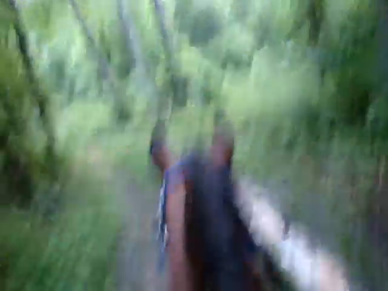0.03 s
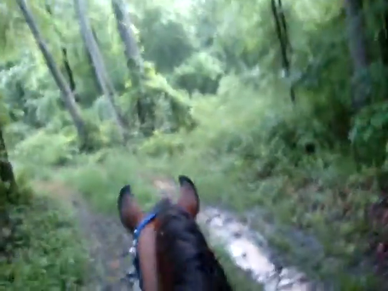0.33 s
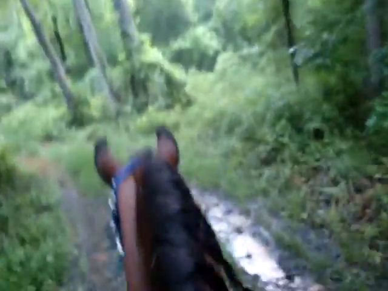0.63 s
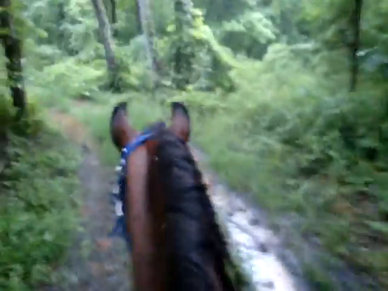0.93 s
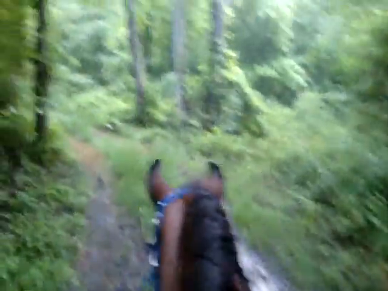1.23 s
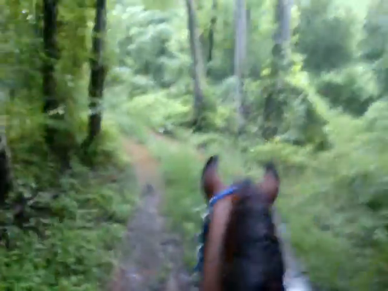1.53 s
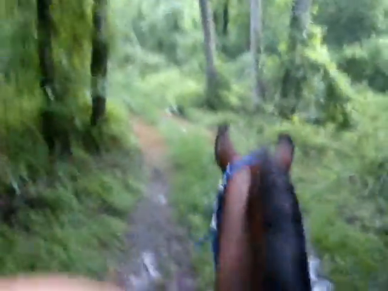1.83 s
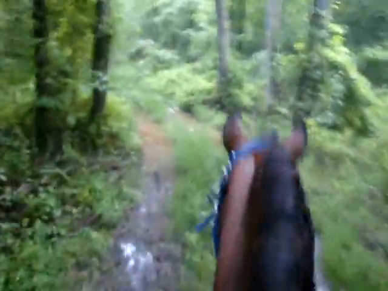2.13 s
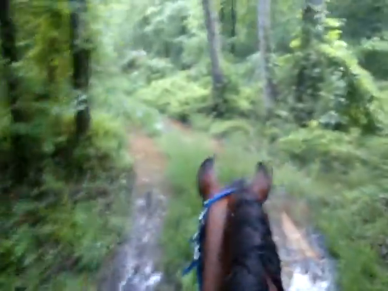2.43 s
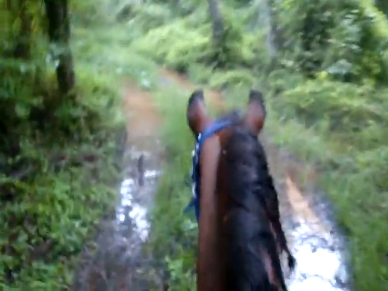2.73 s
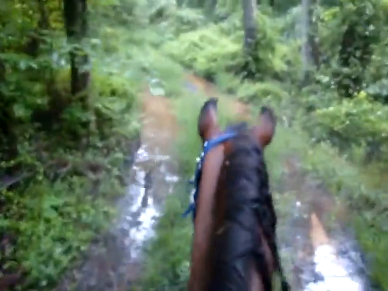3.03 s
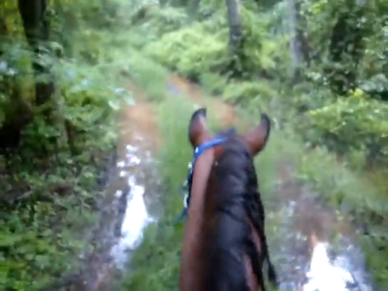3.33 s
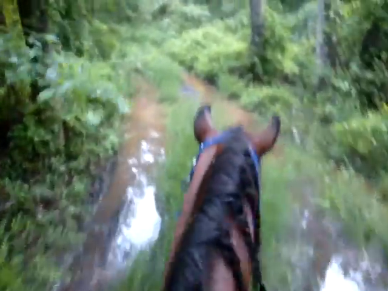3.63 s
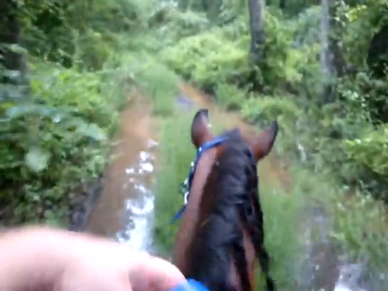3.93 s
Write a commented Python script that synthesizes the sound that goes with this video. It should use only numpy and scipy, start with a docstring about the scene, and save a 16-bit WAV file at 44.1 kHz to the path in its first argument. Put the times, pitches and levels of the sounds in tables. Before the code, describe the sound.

A horse's hooves slap and splash through mud and puddles over a steady wet woodland hiss.

```python
"""A horse walks a wet, muddy woodland track, heard from the saddle on a hand-held mono camera.
Below the microphone, hooves slap into mud, pop pockets of air and throw up water that falls back
as drops; the tack clicks now and then. Right at the microphone, the hand rubs and knocks on the
camera, mostly at first, and air buffets it softly. All around, the wet wood hisses and drips."""
import sys
import numpy as np
from scipy import signal
from scipy.fft import rfft, irfft
from scipy.io import wavfile
from scipy.ndimage import uniform_filter1d

SR = 44100
rng = np.random.default_rng(int(sys.argv[2]) if len(sys.argv) > 2 else 0)


def materialize(psi):
    """Save the field psi as 16-bit PCM at rate SR to the path in sys.argv[1].

    A 1-D psi becomes a single channel; in a 2-D psi each row is a channel.
    """
    bounded = np.clip(np.atleast_2d(psi).T, -1, 1)
    quanta = np.round(bounded * 32767).astype(np.int16)
    wavfile.write(sys.argv[1], SR, quanta)


N = 176400

# Tone of the wet leaves, air on the microphone, camera shell, mud, crack of water, splash and spray.
# Each row: frequency in Hz, relative level in dB.
LEAF_SPECTRUM = [(18, -48), (30, -25), (302, 4.5), (541, 1.5), (818, 3.5), (1620, -1), (2330, 0.5),
                 (5060, 0.5), (6780, -8), (9300, -6), (10000, -10.5), (13000, -45), (22000, -120)]
AIR_SPECTRUM = [(20, -16), (45, -2.5), (100, -2), (160, -7), (400, -37), (2000, -69)]
SHELL_SPECTRUM = [(100, -53), (400, -6.5), (1000, -6.5), (2500, -8.5), (4000, -7.5), (4900, -1),
                  (5800, 4.5), (6500, -3), (8000, -10.5), (10000, -21)]
MUD_SPECTRUM = [(50, -39), (120, -19.5), (240, -0.5), (520, -3.5), (850, -1), (1200, -1.5), (1600, -11),
                (4000, -12.5), (10000, -43)]
CRACK_SPECTRUM = [(200, -19), (800, -1), (1500, -2), (2100, -1), (3300, -6), (5400, -3.5), (7000, -5.5),
                  (10000, -20)]
SPLASH_SPECTRUM = [(80, -32), (220, -24), (480, -7), (800, -2.5), (1500, -1), (2300, 4), (4400, -4.5),
                   (6000, -1), (10000, -14)]
SPRAY_SPECTRUM = [(1000, -21), (3500, -6.5), (4800, -4.5), (5900, -5), (7200, -10.5), (10000, -16)]
# Bands of leaf hiss that flicker separately. Each entry: centre in Hz.
LEAF_BANDS_HZ = [60, 200, 450, 900, 1800, 3500, 6500, 11000]
# Low rumble of air on the microphone. Each row: time in seconds, level in dB.
AIR_LEVELS = [(0, -69), (.28, -61), (.4, -65), (.6, -67.5), (.9, -53), (1.05, -69), (1.55, -59), (1.9, -52),
              (2.25, -55), (2.5, -70.5), (4, -70.5)]
# Skin sliding on the camera body. Each row: start, rise and decay in seconds, level in dB.
HAND_RUBS = [(0, 0.025, 0.048, -32), (.116, 0.029, 0.018, -25), (0.156, 0.013, .0024, -36),
             (.183, 0.033, 0.04, -30), (0.7, 0.011, 0.012, -31), (.712, 0.019, 0.0035, -31.5),
             (2.08, 0.025, .015, -28)]
# Fingers bumping the camera. Each row: time in seconds, level in dB, pitch in Hz.
FINGER_KNOCKS = [(0.0795, -24, 403), (0.1108, -14.5, 474), (0.13, -29, 400), (0.201, -12, 550),
                 (.2640, -15, 520), (0.9206, -21.5, 217), (0.928, -29, 135), (1.8097, -26, 370),
                 (1.8672, -27.5, 174), (1.883, -37.5, 140)]
# Bit and buckles. Each row: start in seconds, click level in dB, pitch in Hz, rattle level in dB.
TACK_CLICKS = [(0.3264, -21, 5860, -32), (.4325, -14.5, 5600, -37), (0.7967, -18.5, 5460, -25),
               (1.7775, -14, 4500, -21.5), (2.0805, -15, 5600, -24), (2.593, -30, 4100, -27),
               (3.4534, -17, 5100, -44)]
# Air pockets popping in the mud. Each row: start in seconds, level in dB, pitch in Hz.
MUD_PLOPS = [(.044, -27.5, 810), (0.326, -33, 512), (.424, -33.5, 1040), (0.761, -31, 1200),
             (0.777, -28.5, 1140), (1.346, -36, 344), (1.811, -34, 407), (2.079, -19.5, 1960),
             (2.1065, -27.5, 1010), (2.109, -32, 388), (2.186, -33, 786), (2.531, -34, 1040),
             (2.536, -36, 474), (2.598, -36.5, 408), (2.710, -37.5, 686), (2.795, -35.5, 483),
             (2.944, -33.5, 1400), (3.256, -34.5, 453), (3.510, -31.5, 750), (3.912, -31.5, 720)]
# Water thrown up by a hoof. Each row: start, rise and decay in seconds, water and spray levels in dB.
HOOF_SPLASHES = [(.30, 0.072, 0.22, -51, -67), (.455, 0.04, 0.036, -48, -44.5),
                 (.555, 0.03, 0.0078, -42.5, -44), (.631, 0.011, .017, -36.5, -56),
                 (.975, 0.0062, 0.051, -42, -70), (1.36, 0.018, 0.065, -45.5, -63),
                 (1.72, 0.021, 0.024, -39, -62), (2.077, 0.0015, 0.024, -36.5, -31),
                 (2.101, .0079, 0.11, -37.5, -37.5), (2.269, 0.057, 0.022, -38.5, -47),
                 (2.379, 0.0027, 0.072, -36, -34.5), (2.61, 0.041, 0.026, -43, -54),
                 (2.766, 0.021, 0.057, -43.5, -36.5), (2.90, 0.072, 0.037, -54, -51.5),
                 (3.15, 0.07, 0.072, -38.5, -41.5), (3.53, 0.029, 0.051, -40.5, -65),
                 (3.70, 0.023, .04, -57, -40.5), (3.837, 0.014, 0.02, -37, -26),
                 (3.871, 0.047, 0.049, -39.5, -31)]
# Hoof slaps and falling clods. Each row: start in seconds, mud and crack levels in dB, decay in seconds.
HOOF_SLAPS = [(0.039, -28.5, -36, 0.0084), (.224, -27.5, -29, 0.0028), (.532, -32, -34.5, 0.0031),
              (0.563, -51, -33.5, .005), (0.589, -40, -34, 0.0034), (0.643, -48, -43, 0.0037),
              (0.686, -32.5, -39, 0.0051), (0.704, -40, -60, 0.03), (0.752, -40, -39.5, 0.013),
              (0.794, -44, -50, .004), (0.931, -39, -36, 0.0063), (1.05, -37.5, -38.5, .0038),
              (1.099, -37.5, -55, 0.012), (1.202, -41, -61, 0.0064), (1.28, -34, -34, 0.0033),
              (1.29, -30, -45, 0.0051), (1.343, -31, -38, 0.0076), (1.454, -39, -42, 0.0073),
              (1.64, -36.5, -39, 0.0087), (1.698, -33.5, -38, 0.0052), (1.809, -38, -41, 0.022),
              (2.023, -37.5, -48, 0.0057), (2.058, -30.5, -41, 0.0037), (2.105, -31.5, -34, 0.0026),
              (2.133, -36, -42, 0.0047), (2.187, -45, -46, .008), (2.281, -33, -35, 0.0038),
              (2.384, -37, -35.5, .008), (2.407, -38, -45, 0.015), (2.529, -39, -52, 0.015),
              (2.595, -51, -40, 0.027), (2.709, -40.5, -39.5, 0.031), (2.742, -43.5, -36, 0.026),
              (2.782, -44.5, -42.5, 0.018), (2.883, -40.5, -58, 0.03), (2.944, -54, -45, .008),
              (3.133, -40, -40, 0.01), (3.256, -38.5, -42, 0.015), (3.372, -55, -39, 0.0022),
              (3.39, -56, -39, .004), (3.451, -39, -27, 0.0058), (3.462, -45, -34, 0.01),
              (3.507, -38.5, -33, 0.018), (3.541, -49, -40, 0.0028), (3.651, -39.5, -43, 0.0054),
              (3.71, -43, -54, 0.011), (3.85, -42.5, -41, 0.0051), (3.909, -39, -36, 0.0044)]

LEAF_DB, LEAF_SWELL_DB, LEAF_FLICKER_DB = -43.5, .5, 2
DRIP_RING_DB, DRIP_TICK_DB = -63.5, -60
SLIPS_PER_S, SLIP_SPREAD_DB = 24000, 1.1
KNOCK_WIDTH_CYCLES, KNOCK_SNAP_DB, KNOCK_SNAP_S = 0.2, -24, .0016
KNOCK_RATTLE_DB, KNOCK_RATTLE_S = -9.5, 0.0029
CLICK_RISE_S, CLICK_DECAY_S, CLICK_RATTLE_S = 0.00048, 0.00025, 0.0025
PLOP_DECAY_CYCLES, PLOP_GLIDE_PER_S = 3.5, 3
BUBBLE_LO_HZ, BUBBLE_HI_HZ, BUBBLE_CYCLES, BUBBLE_DB = 782, 3970, 6.6, -12.5
DROPS_PER_S, DROP_SPREAD_DB = 7000, 2
GOBBETS_PER_S, GOBBET_SPREAD_DB, GOBBET_DECAY_S, GOBBET_DEPTH = 420, 2.2, .0009, 2.2
SLAP_RISE_S = 0.0028
LOW_CUT_HZ, HIGH_CUT_HZ = 67, 10050


def undb(db):
    """Decibels to gain."""
    return 10 ** (np.asarray(db) / 20)


def unit(x):
    """Scale to rms 1."""
    return x / np.sqrt(np.mean(x ** 2) + 1e-18)


def colour(x, spectrum):
    """Filter by a spectrum of (Hz, dB) points; rms 1."""
    hz, db = np.array(spectrum, float).T
    f = np.maximum(np.arange(N // 2 + 1) * SR / N, 1)
    gain = undb(np.interp(np.log(f), np.log(hz), db))
    return unit(irfft(rfft(x) * gain, N))


def noise():
    """White noise."""
    return rng.standard_normal(N)


def wander(per_s):
    """A smooth random drift; rms 1."""
    hold = max(int(SR / per_s), 1)
    steps = np.repeat(noise()[:N // hold + 1], hold)
    return unit(uniform_filter1d(uniform_filter1d(steps, hold), hold)[:N])


def swell(start, rise, decay):
    """A straight rise, then an exponential fall; times in seconds."""
    out, rise = np.zeros(N), max(rise, 1 / SR)
    i = np.arange(max(int(start * SR), 0), min(int((start + rise + 10 * decay) * SR), N))
    age = i / SR - start
    out[i] = np.clip(age / rise, 0, 1) * np.exp(-np.maximum(age - rise, 0) / decay)
    return out


def impacts(per_s, spread_db):
    """Random tiny impacts, a few larger than the rest."""
    size = undb(spread_db * np.minimum(rng.exponential(size=N), 5))
    return (rng.random(N) < per_s / SR) * size * np.sign(noise())


def bubbles(count, spread_db=3, glide=0.18):
    """Small bubbles that ring for a few cycles and rise in pitch."""
    out = np.zeros(2 * N)
    for when, pitch, chance in rng.random((count, 3)):
        hz = BUBBLE_LO_HZ * (BUBBLE_HI_HZ / BUBBLE_LO_HZ) ** pitch
        life = np.linspace(0, 1, int(BUBBLE_CYCLES * SR / hz) + 2)
        cycles = BUBBLE_CYCLES * life * (1 + glide * life / 2)
        ring = np.sin(2 * np.pi * cycles) * undb(-40 * life)
        db = -spread_db * np.log(max(chance, np.exp(-4)))
        i = int(when * N)
        out[i:i + len(life)] += undb(db) * ring
    return unit(out[:N])


def woodland():
    """All around, an even hiss of wet leaves, each band flickering on its own, and a patter of drips."""
    spectrum = rfft(colour(noise(), LEAF_SPECTRUM))
    f = np.arange(len(spectrum)) * SR / N
    hiss = np.zeros(N)
    for weights in np.eye(len(LEAF_BANDS_HZ)):
        band = irfft(spectrum * np.interp(f, LEAF_BANDS_HZ, weights), N)
        hiss += band * undb(LEAF_FLICKER_DB * wander(per_s=110))
    hiss *= undb(LEAF_DB + LEAF_SWELL_DB * wander(per_s=4.85))
    drip_rings = undb(DRIP_RING_DB) * bubbles(count=400)
    drip_ticks = undb(DRIP_TICK_DB) * colour(impacts(per_s=300, spread_db=1.1), CRACK_SPECTRUM)
    return hiss + drip_rings + drip_ticks


def air():
    """Uneven low buffeting on the microphone as the rider sways."""
    level_db = np.interp(np.arange(N) / SR, *np.array(AIR_LEVELS).T)
    return colour(noise(), AIR_SPECTRUM) * undb(level_db + 2.7 * wander(per_s=24.15))


def hand_rubs():
    """Right at the microphone, skin moves in dense tiny slips that hiss in the camera's shell."""
    slips = colour(impacts(SLIPS_PER_S, SLIP_SPREAD_DB), SHELL_SPECTRUM)
    slips *= undb(2.7 * wander(per_s=150))
    return slips * sum(undb(db) * swell(at, rise, decay) for at, rise, decay, db in HAND_RUBS)


def finger_knocks():
    """Each knock on the camera body is one swing of pressure, a snap and a brief rattle."""
    t = np.arange(N) / SR
    rattle = undb(KNOCK_RATTLE_DB) * colour(noise(), MUD_SPECTRUM)
    snap = undb(KNOCK_SNAP_DB) * colour(noise(), CRACK_SPECTRUM)
    out = np.zeros(N)
    for at, db, hz in FINGER_KNOCKS:
        cycles = np.clip(hz * (t - at), -2, 2)
        swing = -np.sin(2 * np.pi * cycles) * np.exp(-(cycles / KNOCK_WIDTH_CYCLES) ** 2 / 2)
        tail = rattle * swell(at, 0, KNOCK_RATTLE_S) + snap * swell(at, 0, KNOCK_SNAP_S)
        out += undb(db) * (swing / swing.max() + tail)
    return out


def tack():
    """Close by, bit and buckles give hard, damped clicks with a short broad rattle."""
    t = np.arange(N) / SR
    rattle = colour(noise(), CRACK_SPECTRUM)
    out = np.zeros(N)
    for at, db, hz, rattle_db in TACK_CLICKS:
        out += undb(db) * np.sin(2 * np.pi * hz * (t - at)) * swell(at, CLICK_RISE_S, CLICK_DECAY_S)
        out += undb(rattle_db) * rattle * swell(at, CLICK_RISE_S, CLICK_RATTLE_S)
    return out


def mud_plops():
    """Down on the track, air trapped in the mud rings for a few cycles, rising slightly in pitch."""
    out = np.zeros(N)
    for at, db, hz in MUD_PLOPS:
        envelope = swell(at, 1 / hz, PLOP_DECAY_CYCLES / hz)
        i = np.flatnonzero(envelope)
        age = i / SR - at
        cycles = hz * age * (1 + PLOP_GLIDE_PER_S * age / 2)
        out[i] += undb(db) * np.sin(2 * np.pi * cycles) * envelope[i]
    return out


def broken_water(spectrum):
    """The grain of broken water: dense drops with bubbles among them."""
    drops = colour(impacts(DROPS_PER_S, DROP_SPREAD_DB), spectrum)
    return drops + undb(BUBBLE_DB) * bubbles(count=1600)


def gobbets():
    """Water lands in separate gobbets: a gain that jumps with each and falls back at once."""
    landings = np.abs(impacts(GOBBETS_PER_S, GOBBET_SPREAD_DB))
    fall = np.exp(-np.arange(N // 100) / SR / GOBBET_DECAY_S)
    return unit(4 + GOBBET_DEPTH * signal.fftconvolve(landings, fall)[:N])


def hoof_splashes():
    """Water and fine spray, thrown up by the hooves, swell and fall back on the track."""
    water_level = sum(undb(db) * swell(at, rise, decay) for at, rise, decay, db, _ in HOOF_SPLASHES)
    spray_level = sum(undb(db) * swell(at, rise, decay) for at, rise, decay, _, db in HOOF_SPLASHES)
    spatter = gobbets()
    water = water_level * broken_water(SPLASH_SPECTRUM)
    spray = spray_level * colour(impacts(DROPS_PER_S, DROP_SPREAD_DB), SPRAY_SPECTRUM)
    return spatter * (water + spray)


def hoof_slaps():
    """Below the saddle, each hoof or clod lands with a dull body of mud and a crack of water."""
    mud_level = sum(undb(db) * swell(at, SLAP_RISE_S, decay) for at, db, _, decay in HOOF_SLAPS)
    crack_level = sum(undb(db) * swell(at, SLAP_RISE_S, decay) for at, _, db, decay in HOOF_SLAPS)
    return mud_level * colour(noise(), MUD_SPECTRUM) + crack_level * broken_water(CRACK_SPECTRUM)


def scene():
    """All sources at one microphone in the rider's hand, the same in both channels."""
    hooves = hoof_splashes() + hoof_slaps() + mud_plops()
    handling = hand_rubs() + finger_knocks()
    return np.tile(hooves + handling + tack() + woodland() + air(), (2, 1))


def record(dry):
    """The camera thins the deep bass and cuts the top steeply."""
    low_cut = signal.butter(2, LOW_CUT_HZ, "high", fs=SR, output="sos")
    high_cut = signal.ellip(12, .1, 70, HIGH_CUT_HZ, fs=SR, output="sos")
    return signal.sosfilt(high_cut, signal.sosfilt(low_cut, dry))


dry = scene()
out = record(dry)
materialize(out)
```